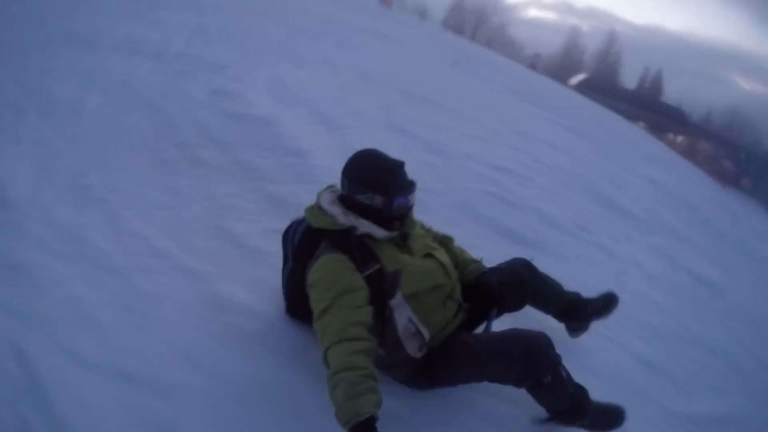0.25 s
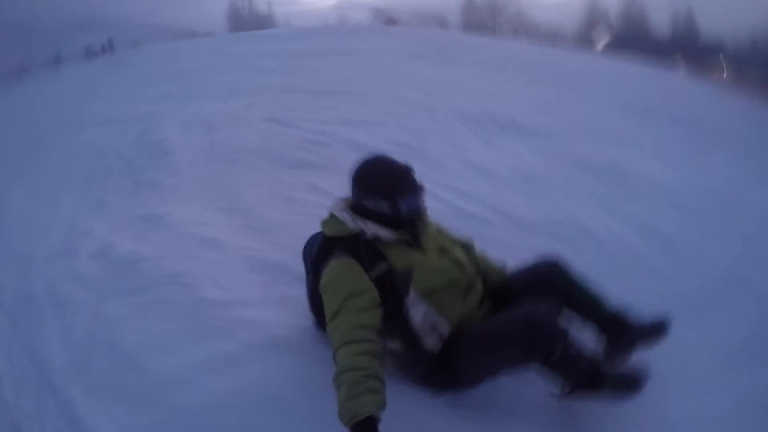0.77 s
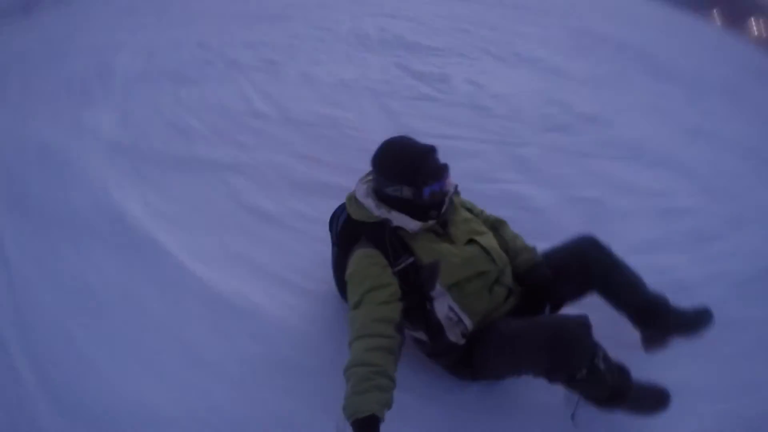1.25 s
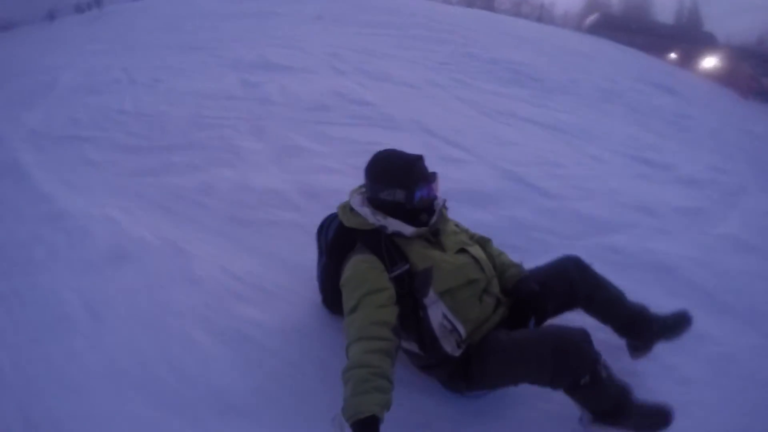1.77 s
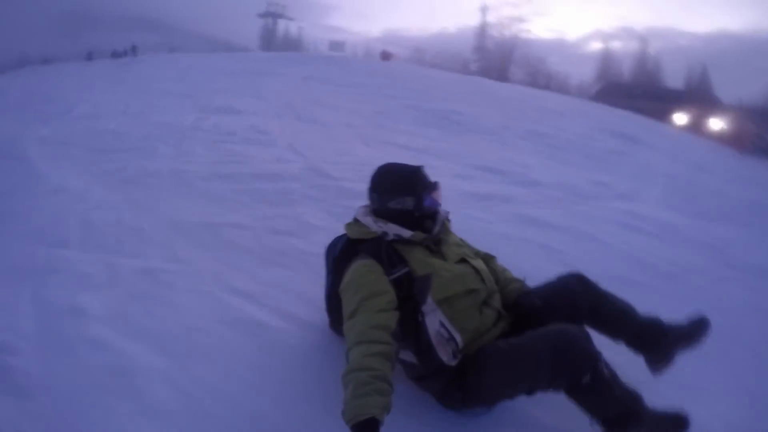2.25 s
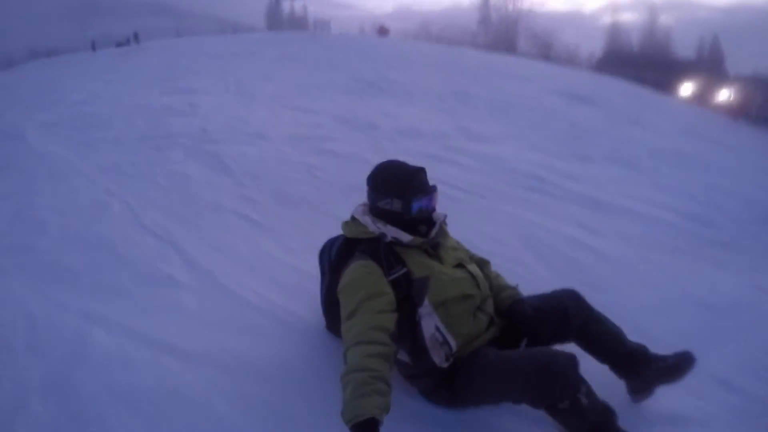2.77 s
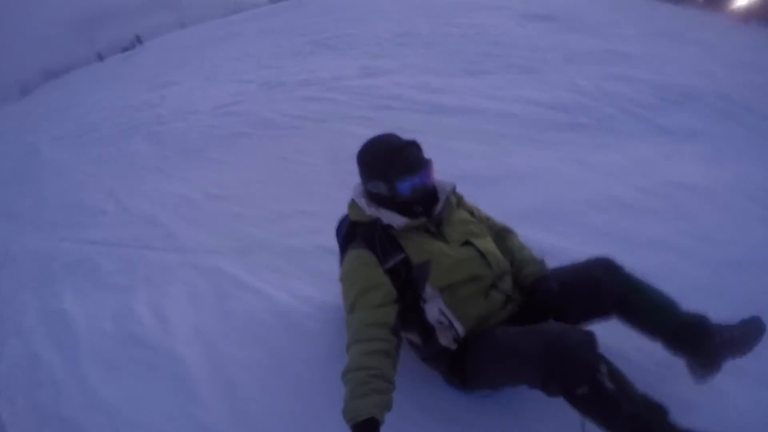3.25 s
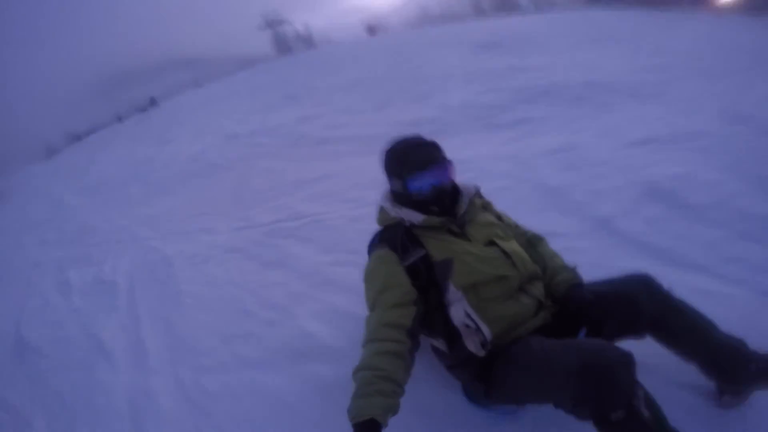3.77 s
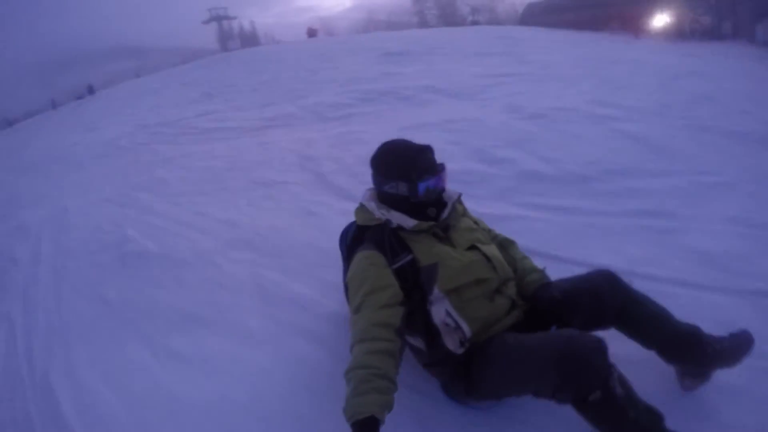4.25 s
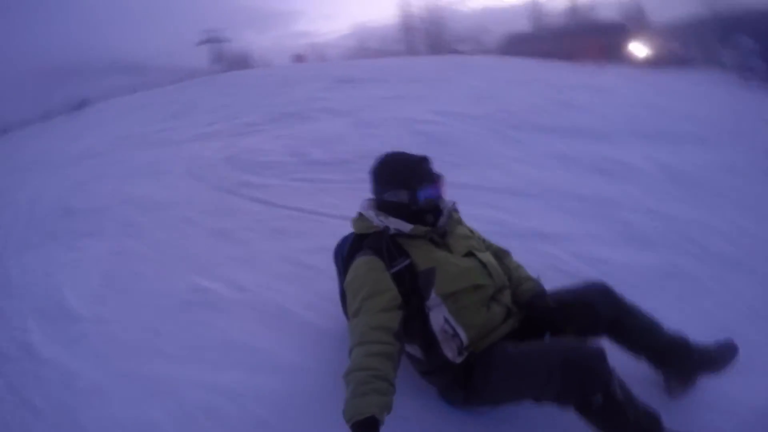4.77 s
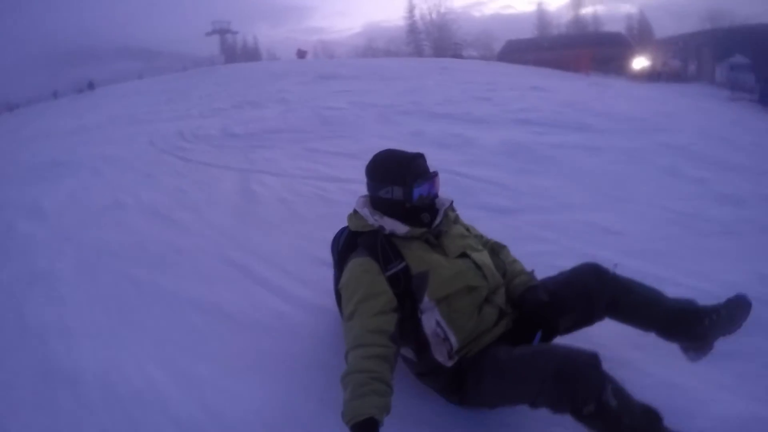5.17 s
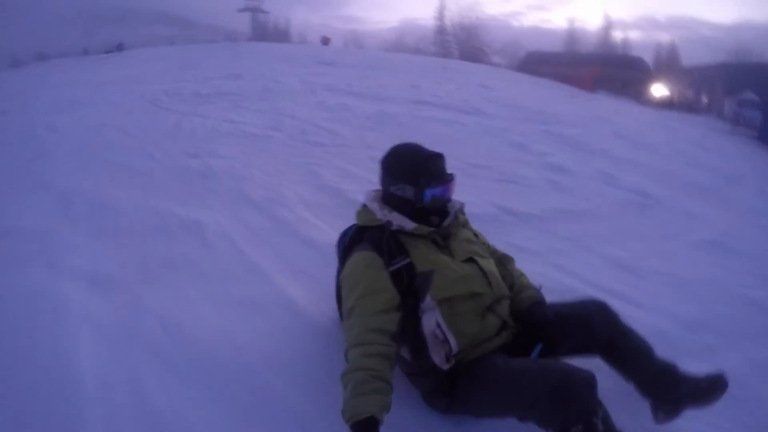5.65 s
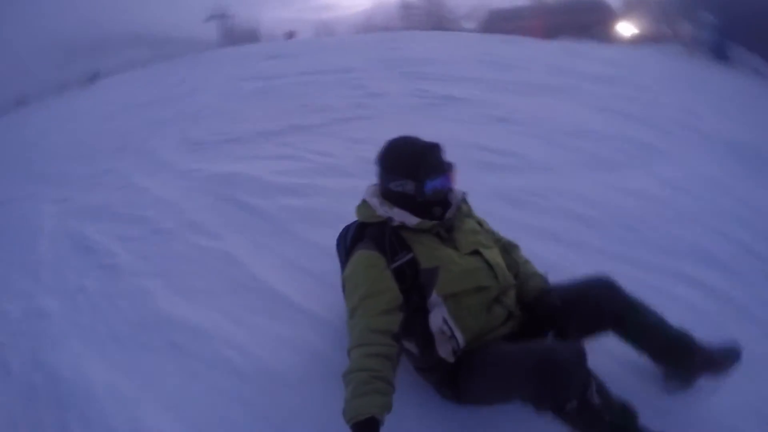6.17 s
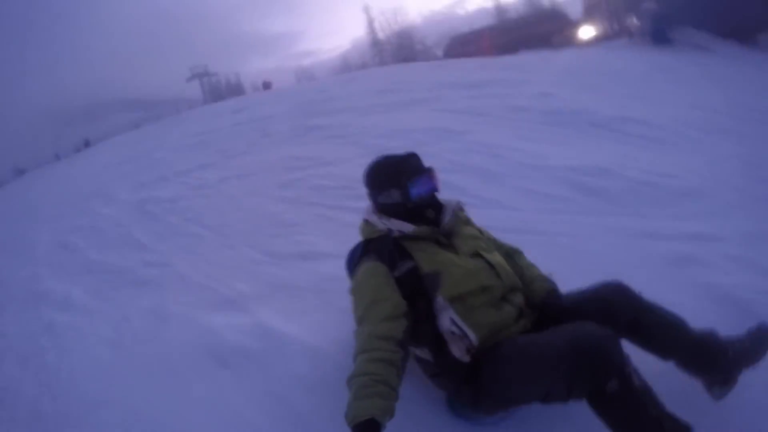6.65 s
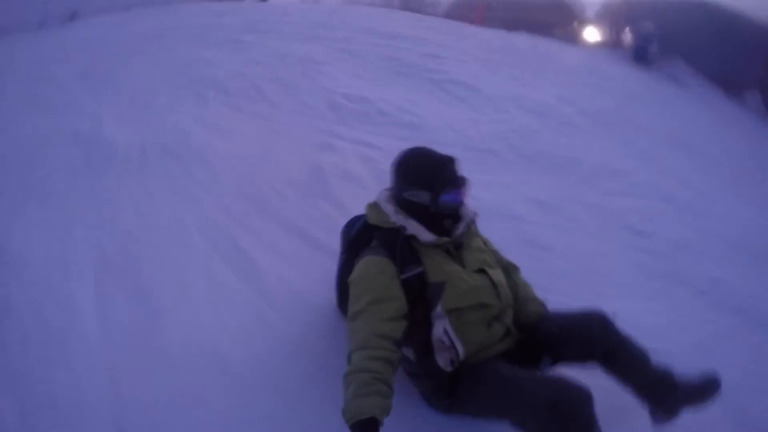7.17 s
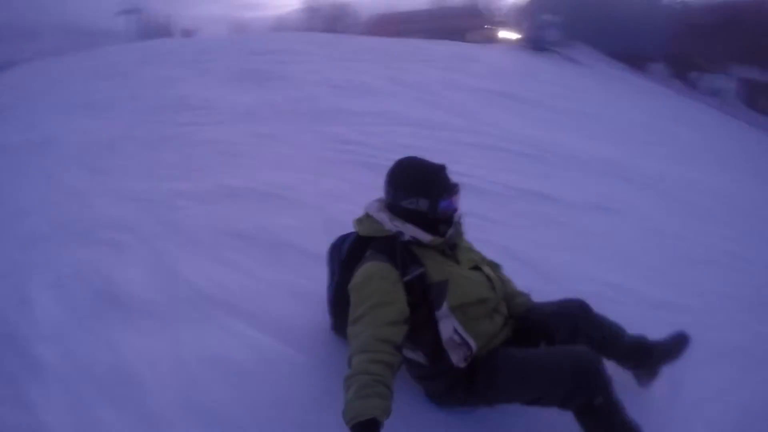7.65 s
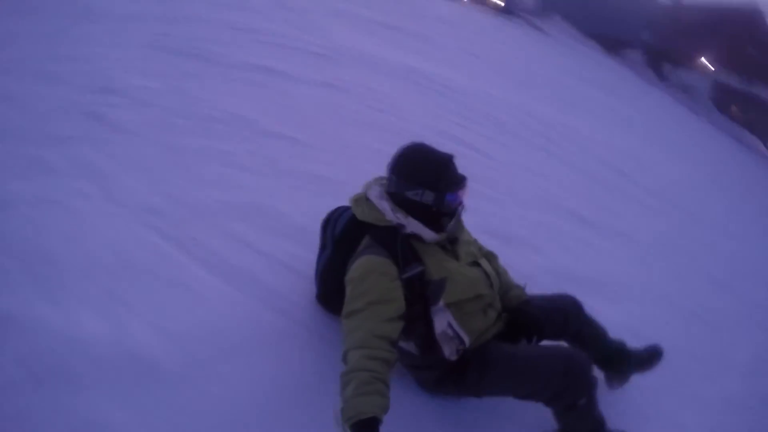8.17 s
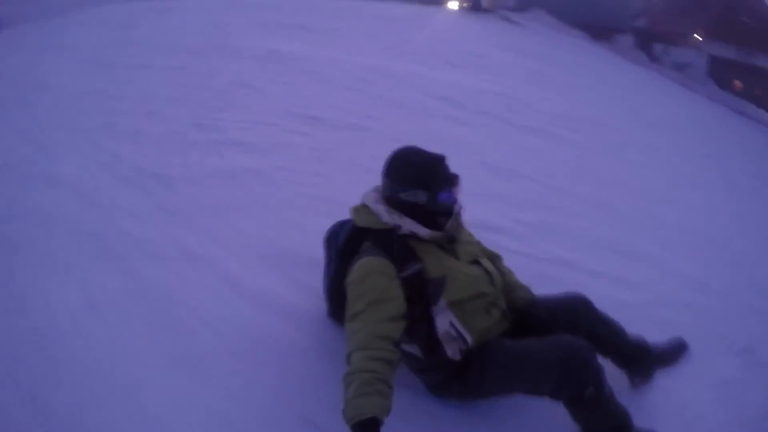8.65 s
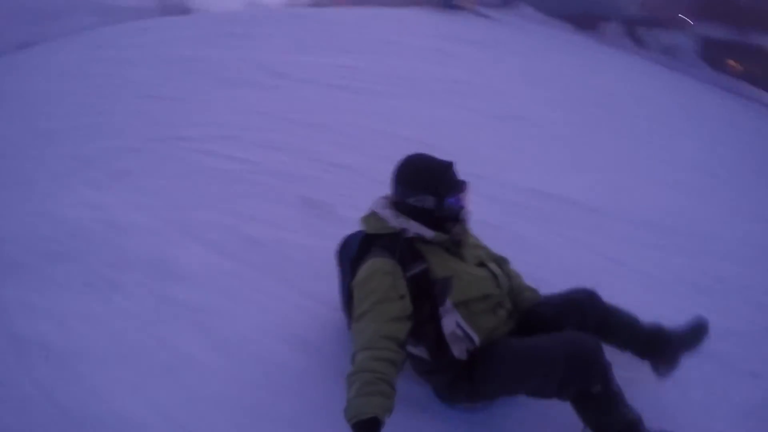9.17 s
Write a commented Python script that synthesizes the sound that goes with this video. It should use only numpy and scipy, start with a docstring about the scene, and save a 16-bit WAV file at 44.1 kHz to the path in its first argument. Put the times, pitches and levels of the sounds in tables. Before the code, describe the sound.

A plastic sled slides continuously over packed snow: a grainy, flickering crunch and hiss with short scrapes, heard close through a small camera's closed case on a hand-held pole. Deep wind throbs underneath. Small knocks tick by, then a hard cluster hits past six seconds; afterwards scuffs, hiss and gusts grow denser until the cut.

```python
"""Snow crunches and hisses under a plastic sled, heard by a small camera shut in its case on a hand-held pole.
The slide is dense random grains (crush, spray, scrape, dull rub) rung through the fixed resonances of the case.
Knocks and scuffs come up the pole: knocks are decaying modes with a click, scuffs are bell-shaped swells.
Behind them wind buffets the case, as low filtered noise: a deep throb that follows gusts,
and a weaker rumble at its own changing level."""
import sys
import numpy as np
from scipy import signal
from scipy.fft import rfft, irfft, next_fast_len
from scipy.io import wavfile
from scipy.ndimage import uniform_filter1d, map_coordinates

SR = 44100
rng = np.random.default_rng(int(sys.argv[2]) if len(sys.argv) > 2 else 0)


def wrap_up_sound(samples):
    """Save the sound to the file named by the first command line argument, as 16-bit audio."""
    columns = np.atleast_2d(samples).T
    # keep every value between -1 and 1, then stretch to whole-number steps
    tamed = np.clip(columns, -1, 1)
    steps = np.round(tamed * 32767).astype(np.int16)
    wavfile.write(sys.argv[1], SR, steps)


N = 414540  # length in samples

# how hard the hull bites the snow, as the level of the crush: time_s, level_db
HULL_BITE = [(0, -35), (.24, -41.5), (.28, -35), (.32, -46.5), (.49, -45.5), (.83, -42), (.94, -35),
             (1.04, -34), (1.1, -34.5), (1.28, -41.5), (1.44, -39.5), (1.47, -35), (1.69, -34), (1.75, -41),
             (1.83, -34), (1.98, -36.5), (2.03, -45.5), (2.22, -35.5), (2.27, -41.5), (2.37, -35),
             (2.45, -36.5), (2.52, -49.5), (2.62, -39.5), (2.82, -42), (2.92, -42), (3.0, -43.5),
             (3.1, -47.5), (3.21, -32.5), (3.36, -40.5), (3.42, -43.5), (3.68, -43), (3.81, -41),
             (4.12, -37), (4.38, -35.5), (4.57, -41), (4.67, -32.5), (4.72, -39.5), (4.83, -34),
             (5.06, -37), (5.16, -35), (5.35, -40), (5.44, -37.5), (5.56, -42), (5.69, -44), (5.74, -39.5),
             (5.95, -42.5), (6.16, -42.5), (6.21, -44), (6.39, -41), (6.47, -34), (6.57, -46), (6.62, -37),
             (6.81, -35), (6.99, -32.5), (7.06, -39.5), (7.18, -35.5), (7.28, -45.5), (7.33, -32),
             (7.4, -39.5), (7.49, -42), (7.54, -35), (7.59, -40), (7.66, -35), (7.74, -40), (7.8, -38.5),
             (7.85, -44.5), (7.88, -36), (7.93, -42.5), (7.98, -33), (8.03, -39), (8.09, -33), (8.15, -42),
             (8.3, -40), (8.43, -36), (8.6, -38), (8.74, -35.5), (8.79, -41), (8.95, -31.5), (9.03, -36),
             (9.21, -34.5), (9.34, -33), (9.4, -40)]
MIDDLE_BITE_DB = -39


def slide():
    """Common modulation: ruts jolt the hull, and the changing load makes all four layers flicker together."""
    crush_db, = curves(HULL_BITE)
    bite_db = crush_db - MIDDLE_BITE_DB
    ruts_db = 0.44 * wobble(12) + 1.05 * wobble(20) + 1.0 * wobble(45) + 1.15 * wobble(140)
    scrape_scuff, rub_scuff = scuffs()
    snow = crush(crush_db, ruts_db) + spray(bite_db, ruts_db)
    return snow + scrape(bite_db, ruts_db, scrape_scuff) + rub(bite_db, ruts_db, rub_scuff)


# source spectrum of the crushed grains: frequency_hz, level_db (per Hz)
CRUSH_SPECTRUM = [(700, -44), (1400, -17.5), (2200, -6.5), (3000, -2), (4500, -2.5), (6500, -11.5),
                  (12000, -12)]


def crush(crush_db, ruts_db):
    """Granular fracture: dense grains break under the hull, at a level set by its bite."""
    return grit(CRUSH_SPECTRUM, spiky_db=0.5, patchy_db=1.5) * amp(crush_db + 1.03 * ruts_db)


# source spectrum of the spray: frequency_hz, level_db (per Hz)
SPRAY_SPECTRUM = [(3000, -4), (5500, -4.5), (7500, -1.5), (11000, -3), (15000, -0.5)]
# spray thrown up by speed, at a middling bite: time_s, level_db
SPRAY_SPEED = [(0, -54), (.3, -54), (.8, -50), (1.0, -51), (1.5, -51), (2.4, -53), (2.85, -46),
               (3.05, -65.5), (3.9, -48), (4.7, -54), (5.4, -51), (5.66, -52.5), (5.74, -45), (6.8, -54),
               (7.3, -44), (7.65, -48), (7.9, -43), (8.5, -46), (8.9, -45.5), (9.4, -46.5)]
SPRAY_FOLLOWS = 0.2  # dB per dB of bite


def spray(bite_db, ruts_db):
    """Scattered impacts: thrown grains hiss at a level set by speed and, weakly, by bite."""
    speed_db, = curves(SPRAY_SPEED)
    level_db = speed_db + SPRAY_FOLLOWS * bite_db
    flicker_db = 0.99 * ruts_db + 0.43 * wobble(9.2)
    return grit(SPRAY_SPECTRUM, spiky_db=1.5, patchy_db=2.5) * amp(level_db + flicker_db)


# source spectrum of the scrape: frequency_hz, level_db (per Hz)
SCRAPE_SPECTRUM = [(400, -44), (650, -27), (800, -0.5), (1400, -2), (2200, -6), (4000, -10.5)]
SCRAPE_DB, SCRAPE_FOLLOWS = -52, 0.47  # steady level at a middling bite; dB per dB of bite


def scrape(bite_db, ruts_db, scuff_gain):
    """Stochastic friction: spiky, patchy grains scrape steadily, with scuffs added to their gain."""
    steady_gain = amp(SCRAPE_DB + SCRAPE_FOLLOWS * bite_db + 0.8 * wobble(12))
    flicker = amp(0.28 * ruts_db + 1.1 * wobble(30))
    return grit(SCRAPE_SPECTRUM, spiky_db=2.5, patchy_db=3.1) * (scuff_gain + steady_gain) * flicker


# source spectrum of the dull rub: frequency_hz, level_db (per Hz)
RUB_SPECTRUM = [(120, -20), (200, 1), (350, 0), (600, -5), (750, -3), (1200, -56)]
RUB_DB, RUB_FOLLOWS = -68.5, 0.3  # steady level at a middling bite; dB per dB of bite


def rub(bite_db, ruts_db, scuff_gain):
    """Low-frequency friction: a dull rub under the scrape, with the same scuff times."""
    steady_gain = amp(RUB_DB + RUB_FOLLOWS * bite_db + 2.3 * wobble(20))
    return grit(RUB_SPECTRUM, spiky_db=2.5, patchy_db=0.5) * (scuff_gain + steady_gain) * amp(0.57 * ruts_db)


# scuffs that come up the pole: peak_s, length_s, scrape_db, rub_db
POLE_SCUFFS = [(0.163, 0.054, -43, -52.5), (0.545, 0.13, -59, -68), (0.862, 0.054, -55, -69),
               (0.985, 0.11, -46, -68), (1.186, 0.099, -40.5, -60), (1.463, 0.045, -51, -68),
               (1.777, 0.1, -54, -74), (2.805, 0.037, -53, -77), (3.067, 0.089, -47, -70),
               (3.22, 0.15, -46.5, -71), (3.377, 0.037, -46, -63), (3.447, 0.076, -46, -64),
               (3.8, 0.094, -50, -78), (5.154, 0.11, -43.5, -89), (6.147, 0.05, -53, -64),
               (6.467, 0.092, -42, -56), (6.903, 0.096, -51, -82), (7.17, 0.13, -49.5, -72),
               (7.323, 0.11, -49.5, -71), (7.69, 0.052, -59, -70), (7.887, .06, -50, -59),
               (7.98, 0.042, -44, -56.5), (8.09, 0.048, -47, -65), (8.185, .05, -51, -64),
               (8.266, 0.064, -49, -62.5), (8.42, 0.036, -50, -67), (8.73, 0.13, -49.5, -66),
               (9.241, 0.023, -44, -42), (9.317, 0.05, -50, -60)]


def scuffs():
    """Gaussian envelopes: the gains of scrape and rub swell and fade as a bell at each scuff."""
    peak_s, length_s, *levels_db = np.transpose(POLE_SCUFFS)
    t = np.arange(0, N + 64, 64) / SR  # coarse time grid, s
    bells = np.exp(-(2 * (t[:, None] - peak_s) / length_s) ** 2)
    return [np.interp(np.arange(N) / SR, t, bells @ amp(db)) for db in levels_db]


def grit(spectrum, spiky_db, patchy_db):
    """Shaped noise: grains of uneven size, in patches of time and frequency, ring the case; rms 1."""
    size_db = spiky_db * np.clip(wobble(900), -2, 2)
    grains = rng.standard_normal(N) * amp(size_db)
    z = signal.stft(grains, nperseg=512)[2]
    field = uniform_filter1d(rng.standard_normal(z.shape), 6, axis=0)  # smooth over frequency
    field = uniform_filter1d(field, 8, axis=1)  # smooth over time
    patched = signal.istft(z * amp(patchy_db * unit(field)), nperseg=512)[1][:N]
    return unit(filtered(patched, lambda hz: colour(spectrum)(hz) * case(hz)))


# resonances of the case: frequency_hz, width_hz, level_db
CASE_MODES = [(218, 89, -12.5), (337, 95, -13.5), (548, 103, -7.5), (845, 103, -6.5), (984, 122, -4),
              (1269, 216, -0.5), (1643, 298, 0), (2220, 156, -2), (2627, 353, -2), (3097, 300, 0.5),
              (4033, 383, -5.5), (4870, 310, -10), (5330, 520, -10.5), (6430, 550, -10.5), (7673, 295, -7),
              (8610, 510, -11), (9720, 780, -15.5), (11300, 1350, -19.5), (12900, 1100, -16)]
# gaps between the resonances: frequency_hz, width_hz, depth (0-1)
CASE_GAPS = [(1450, 264, 0.72), (1820, 230, 0.37), (3490, 590, 0.78), (5770, 310, 0.6), (6880, 280, 0.16),
             (10300, 290, 0.22)]


def case(hz):
    """Modal superposition: causal resonances of alternating sign add up, and notches deepen the gaps."""
    def peak(centre, width):
        return 1j * hz * width / (centre * centre - hz * hz + 1j * hz * width)

    modes = sum((-1) ** k * amp(db) * peak(c, w) for k, (c, w, db) in enumerate(CASE_MODES))
    return modes * np.prod([1 - depth * peak(c, w) for c, w, depth in CASE_GAPS], axis=0)


# knocks that come up the pole, peak level of each mode group: start_s, body_db, crack_db, thud_db, snap_db
POLE_KNOCKS = [(0.14, -44, -25, -53, -46), (0.984, -44, -33, -46, -32), (1.455, -29.5, -25, -56, -31),
               (2.503, -41, -43, -63, -45), (2.651, -42, -48, -60, -43), (3.625, -37, -34, -69, -48),
               (6.42, -16, -26, -53, -30), (6.446, -12.5, -19, -56, -22), (6.454, -24, -9.5, -55, -15.5),
               (6.459, -37, -27, -58, -36), (6.476, -36, -23, -58, -34), (6.482, -31, -27, -58, -30),
               (6.606, -36, -42, -59, -36), (6.858, -26.5, -37, -62, -42), (7.106, -31.5, -37, -60, -41),
               (7.724, -34, -39, -63, -38), (7.939, -40, -47, -57, -35), (8.179, -36, -45, -58, -45),
               (8.245, -39, -29.5, -66, -44), (8.469, -38, -26.5, -53, -41), (8.571, -28, -46, -52, -42),
               (8.988, -50, -25, -66, -33), (9.08, -51, -31, -57, -29), (9.228, -19.5, -20, -28, -26),
               (9.327, -29.5, -29, -55, -31)]
# modes that a blow rings, one group each for body, crack, thud and snap: frequency_hz, level_db, t60_s
BLOW_MODES = [
    [(930, -13.5, 0.015), (953, -2, 0.025), (1205, 3.5, 0.015), (1293, 2.5, 0.013)],
    [(2248, -9.5, 0.034), (2490, 0, 0.015), (2860, 0, 0.0092)],
    [(234, -5, 0.057), (320, -4.5, 0.055), (530, -4.5, 0.062)],
    [(3924, 4, 0.014), (5610, -4, .01)],
]
CLICK_DB, CLICK_T60_S = -3, 0.005  # broad click of the contact; peak level relative to the snap


def knocks():
    """Impact excitation: contact builds over about two ms and rings four mode groups, varied at each blow."""
    out, t = np.zeros(N + SR), np.arange(4096) / SR
    contact = (1 - np.exp(-t / 0.0006)) ** 2
    for start_s, *levels_db in POLE_KNOCKS + ticks(count=20):
        place = out[round(start_s * SR):][:len(t)]  # a view: adding to it adds to out
        for db, modes in zip(levels_db, BLOW_MODES):
            hz, mode_db, t60 = np.transpose(modes)[:, :, None]
            vary_level, vary_pitch = rng.standard_normal((2, len(modes), 1))
            strength = amp(mode_db + 1.5 * vary_level - 60 * t / t60)
            tones = np.sin(2 * np.pi * hz * (1 + 0.013 * vary_pitch) * t)
            ring = contact * np.sum(strength * tones, axis=0)
            place += amp(db) * ring / np.abs(ring).max()
        noise = np.diff(uniform_filter1d(rng.standard_normal(len(t) + 1), size=3))
        click = noise * contact * amp(-60 * t / CLICK_T60_S)
        place += amp(levels_db[-1] + CLICK_DB) * click / np.abs(click).max()
    return out[:N]


TICK_DB, TICK_SCATTER_DB = [-45, -47, -58.5, -46], 4  # middle peak levels of body, crack, thud, snap


def ticks(count):
    """Random independent events: small blows at uniform times and scattered levels, as rows like the knocks."""
    start_s = rng.uniform(0, N / SR, (count, 1))
    scatter = rng.standard_normal((count, len(BLOW_MODES)))
    return np.hstack([start_s, TICK_DB + TICK_SCATTER_DB * scatter]).tolist()


def wind():
    """Turbulent pressure: eddies press on the case as a deep throb and a weaker rumble above it."""
    return throb() + rumble()


# noise spectrum of the throb before its swings are evened: frequency_hz, level_db
THROB_SPECTRUM = [(8, -40), (18, -3.5), (24, 3), (32, 1.5), (42, -7), (55, -17.5), (80, -61)]
# gusts on the case: time_s, level_db
WIND_GUSTS = [(0.0, -37), (0.13, -22), (0.36, -21.5), (0.5, -33), (0.55, -54.5), (0.63, -26.5),
              (1.86, -34.5), (1.96, -25.5), (2.04, -36.5), (2.54, -26.5), (2.59, -34.5), (3.35, -34.5),
              (3.53, -39), (3.69, -32.5), (3.82, -38), (3.87, -29), (4.03, -38), (4.42, -30.5),
              (4.79, -40.5), (5.23, -30.5), (5.29, -46), (5.39, -33.5), (5.5, -19.5), (5.55, -32.5),
              (6.18, -26.5), (6.23, -39), (6.28, -25.5), (6.41, -42), (6.52, -21), (6.75, -37), (7.2, -29),
              (7.3, -17.5), (7.38, -36), (7.43, -19.5), (7.49, -33.5), (7.93, -29), (7.96, -22),
              (8.25, -30.5), (8.54, -21.5), (8.59, -31), (8.64, -18.5), (8.72, -33), (8.79, -19.5),
              (8.93, -35), (9.03, -17.5), (9.08, -34), (9.29, -20.5), (9.4, -18.5)]
EDDY_DB = 1.5  # random swing


def throb():
    """Band-limited noise with compressed envelope: the swings of the throb are evened out, then follow gusts."""
    level_db, = curves(WIND_GUSTS)
    noise = filtered(rng.standard_normal(N), colour(THROB_SPECTRUM))
    swing = np.abs(signal.hilbert(noise, next_fast_len(N))[:N])
    even = unit(noise / (swing + 0.28 * np.mean(swing)) ** 0.52)
    eddies = unit(even * amp(EDDY_DB * wobble(12)))
    # a low-pass keeps the throb deep and smooth after its swings are evened
    smooth = unit(filtered(eddies, lambda hz: 1 / (1 + (hz / 110) ** 4)))
    return amp(level_db) * smooth


# noise spectrum of the upper rumble: frequency_hz, level_db
RUMBLE_SPECTRUM = [(35, -14), (55, 0), (70, 1), (90, -13), (120, -23), (160, -29.5), (220, -37), (400, -73)]
# strength of the upper rumble: time_s, level_db
RUMBLE_LEVEL = [(0.0, -49.5), (0.94, -46), (1.36, -46.5), (4.55, -53.5), (6.02, -50), (6.18, -50),
                (6.44, -45), (6.6, -45.5), (6.81, -52), (7.43, -46), (7.49, -53), (7.7, -42), (7.83, -48),
                (7.88, -39), (8.11, -44), (8.74, -41.5), (9.14, -45), (9.4, -50)]


def rumble():
    """Band-limited noise: a weak rumble reaching above the throb, at its own changing level."""
    level_db, = curves(RUMBLE_LEVEL)
    return amp(level_db) * unit(filtered(rng.standard_normal(N), colour(RUMBLE_SPECTRUM)))


def amp(db):
    """Decibel law: the amplitude gain of a level in dB."""
    return 10 ** (np.asarray(db) / 20)


def unit(x):
    """Normalisation by mean power: x at rms 1."""
    return x / np.sqrt(np.mean(x ** 2) + 1e-20)


def colour(points):
    """Spectral envelope: gain from (Hz, dB) points on a log axis, -120 dB below, last level held above."""
    f, db = np.transpose(points)
    return lambda hz: amp(np.interp(np.log(hz + 1), np.log(f + 1), db, left=-120, right=db[-1]))


def curves(rows):
    """Linear interpolation: one value per sample for each column after the time."""
    s, *cols = np.transpose(rows)
    return [np.interp(np.arange(N) / SR, s, c) for c in cols]


def wobble(rate):
    """Slow random modulation: a smooth curve through random knots, rate knots a second."""
    knots = rng.standard_normal(int(N * rate / SR) + 4)
    return map_coordinates(knots, [np.arange(N) * rate / SR])


def filtered(x, response):
    """Linear filtering: the spectrum of x times a response of frequency, with padding for the tail."""
    m = next_fast_len(N + SR // 2)
    return irfft(rfft(x, m) * response(np.fft.rfftfreq(m, 1 / SR)), m)[:N]


def scene():
    """Linear superposition: all sources add at the single microphone."""
    return (slide() + knocks() + wind())[None]


def record(dry):
    """Band limitation: the camera keeps nothing from 15290 Hz up."""
    return filtered(dry[0], lambda hz: hz < 15290)[None]


dry = scene()
out = record(dry)
wrap_up_sound(out)
```